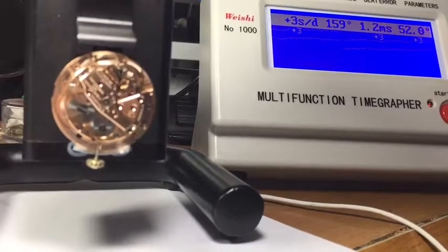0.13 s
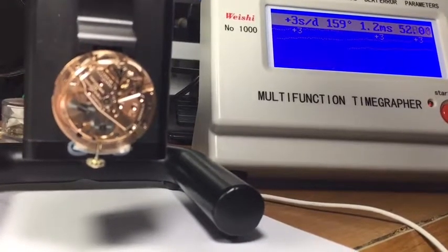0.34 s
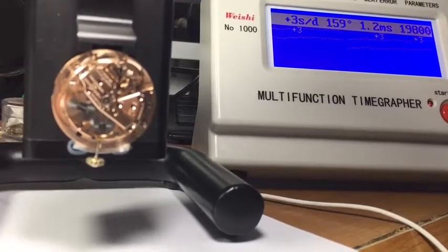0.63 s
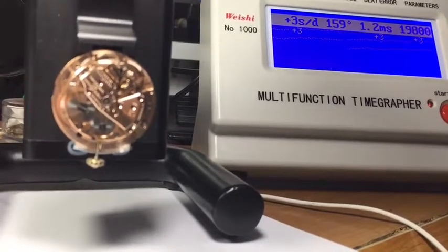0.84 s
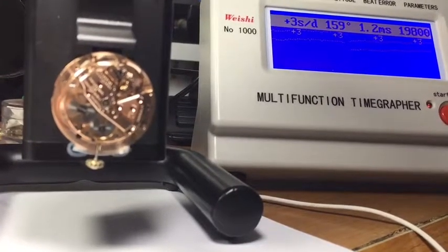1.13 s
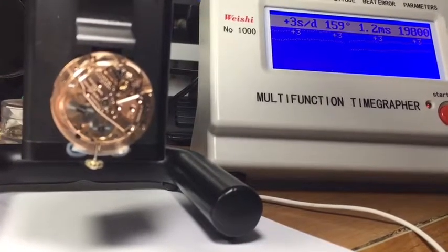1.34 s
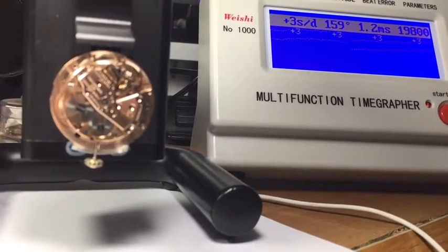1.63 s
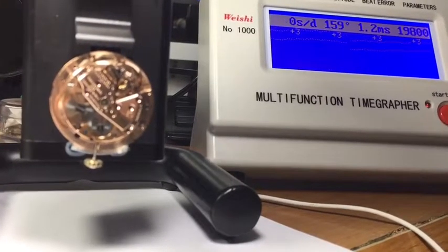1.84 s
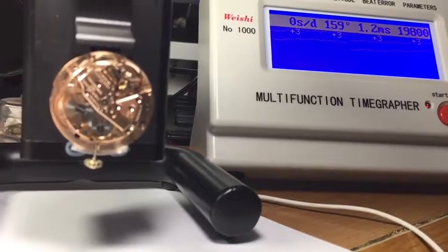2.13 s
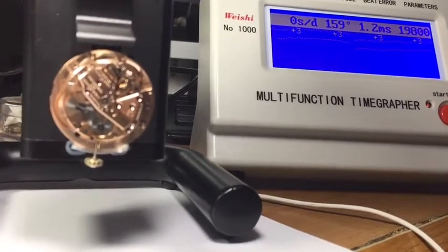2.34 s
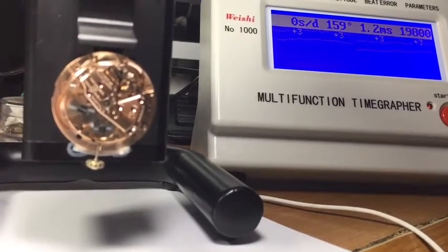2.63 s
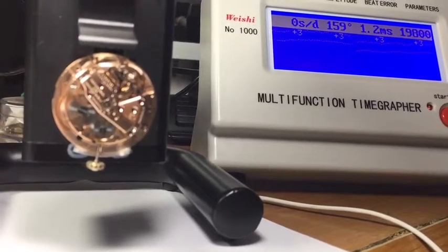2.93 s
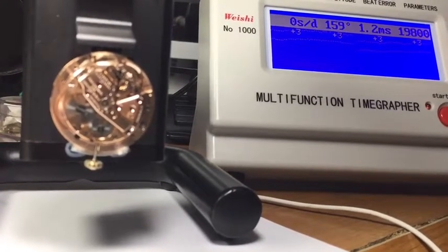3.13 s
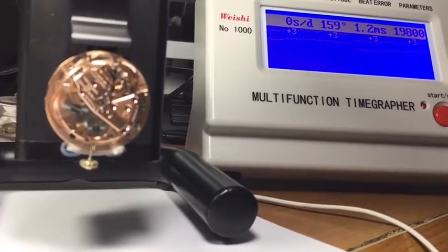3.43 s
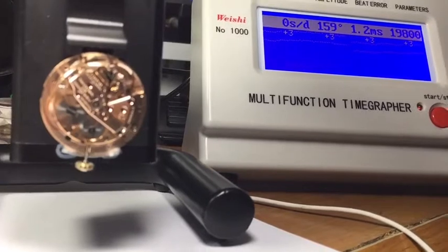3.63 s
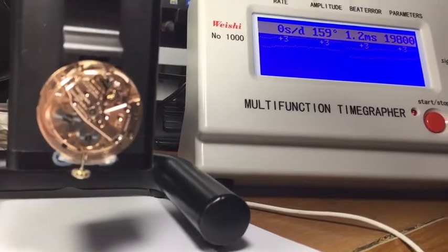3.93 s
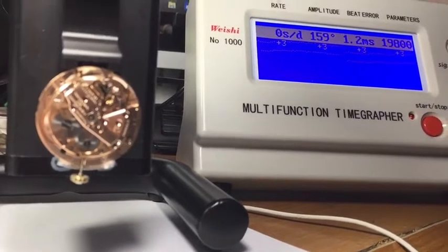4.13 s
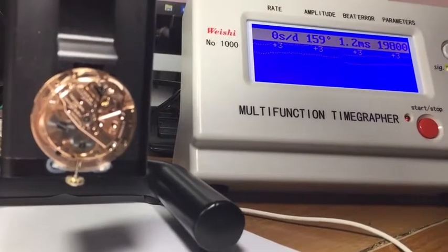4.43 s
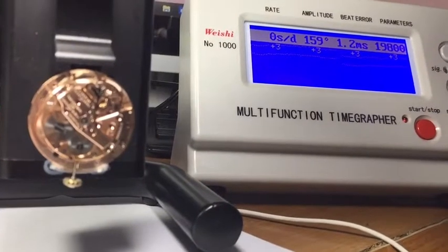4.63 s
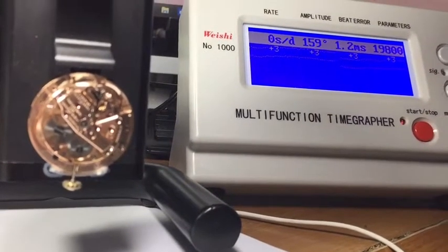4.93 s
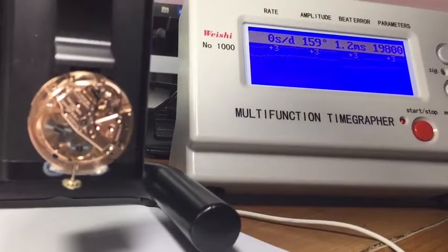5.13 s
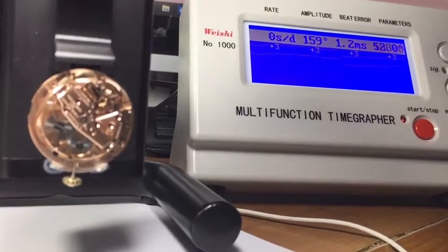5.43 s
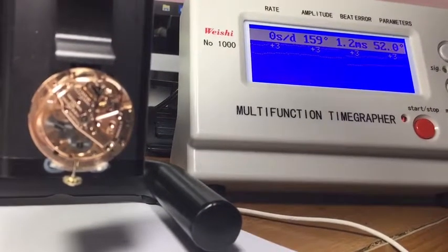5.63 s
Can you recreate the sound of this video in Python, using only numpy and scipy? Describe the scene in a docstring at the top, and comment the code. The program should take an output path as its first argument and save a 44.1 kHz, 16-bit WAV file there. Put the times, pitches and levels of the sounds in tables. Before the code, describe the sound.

A timing machine's buzzer ticks loudly and steadily along with a mechanical watch, close up in a quiet, faintly humming workshop.

```python
"""A timing machine's buzzer ticks loudly, close to the microphone, on a bench in a quiet workshop.
It answers a mechanical watch, whose escapement clicks faintly in the high treble 5.5 times a second.
Each tick bounces off the bench and rings briefly in the room. Mains hum, appliance tones, hiss and a
low rumble lie underneath; the hand on the microphone bumps softly, and a faint whine sets in late."""
import sys
import numpy as np
from scipy import signal
from scipy.fft import rfft, irfft
from scipy.io import wavfile
from scipy.ndimage import uniform_filter1d

SR = 44100
rng = np.random.default_rng(int(sys.argv[2]) if len(sys.argv) > 2 else 0)


def unload_audio(sound):
    """Save the sound as a 16-bit wav file, at the path given as the first command line argument."""
    columns = np.transpose(np.atleast_2d(sound))
    # keep every value between -1 and 1, then stretch to whole-number steps
    steps = np.round(np.clip(columns, -1, 1) * 32767)
    wavfile.write(sys.argv[1], SR, steps.astype(np.int16))


N = 254898
T = np.arange(N) / SR
HZ = np.fft.rfftfreq(2 * N, 1 / SR) + 1e-9


def undb(db):
    """Decibels to gain."""
    return 10 ** (np.asarray(db) / 20)


def filtered(x, response):
    """Pass a sound through a frequency response given on HZ."""
    return irfft(rfft(x, 2 * N) * response)[:N]


def resonances(modes):
    """Response of steep resonances side by side: each band-pass acts twice."""
    return sum(undb(db) / (1 + 1j * (HZ / hz - hz / HZ) * hz / width) ** 2 for hz, width, db in modes)


def impulses(times, sizes):
    """Band-limited impulses at the given seconds."""
    centres = np.asarray(times)[:, None] * SR
    taps = np.floor(centres).astype(int) + np.arange(-7, 9)
    shape = np.sinc(taps - centres) * np.sinc((taps - centres) / 8) * np.reshape(sizes, (-1, 1))
    inside = (taps >= 0) & (taps < N)
    return np.bincount(taps[inside], shape[inside], N)


def rattle(blows, decay_s, modes):
    """Each blow starts a dying burst of noise, coloured by the modes."""
    envelope = signal.lfilter([1], [1, -np.exp(-1 / (decay_s * SR))], blows + 1e-18)
    return filtered(envelope * rng.standard_normal(N), resonances(modes))


def walk(rate_hz):
    """Random levels held for 1 / rate_hz seconds and smoothed twice; spread 1."""
    hold = max(int(SR / rate_hz), 1)
    steps = np.repeat(rng.standard_normal(N // hold + 1), hold)
    smooth = uniform_filter1d(uniform_filter1d(steps, hold), hold)[:N]
    return smooth / smooth.std()


def tone(hz, waver_hz):
    """A sine of rms 1 whose pitch wanders."""
    cycles = np.cumsum(hz + waver_hz * walk(12)) / SR + rng.random()
    return np.sqrt(2) * np.sin(2 * np.pi * cycles)


# Swells of the mains hum, which the rumble follows too (time [s], level [dB])
HUM_SWELLS = [(0.0, -64), (0.06, -60), (0.61, -54), (0.66, -73), (0.96, -53.5), (1.24, -78), (1.54, -54.5),
              (2.01, -68.5), (2.12, -53.5), (2.45, -70), (2.61, -51.5), (2.7, -72), (3.35, -55),
              (3.75, -74.5), (3.83, -58.5), (4.52, -53), (4.62, -65), (5.78, -53)]


def mains_hum(hz=100, waver_hz=0.88, flutter_db=0.5):
    """Mains hum swells and fades in the workshop."""
    level_db = np.interp(T, *np.transpose(HUM_SWELLS))
    return tone(hz, waver_hz) * undb(level_db + flutter_db * walk(10))


def rumble(level_db=-64, hz=54, width_hz=26, follow_share=0.7):
    """A deep band of noise comes and goes with the hum."""
    noise = filtered(rng.standard_normal(N), resonances([(hz, width_hz, 0)]))
    hum_db = np.interp(T, *np.transpose(HUM_SWELLS))
    surge_db = follow_share * (hum_db - hum_db.mean())
    return undb(level_db + surge_db) * noise / noise.std()


# Tones of appliances in the background (frequency [Hz], level [dB], pitch waver [Hz])
APPLIANCE_TONES = [(146.1, -68.5, 3.05), (198.5, -69.5, 2.17), (230.3, -66, 2.507), (276.7, -67.5, 2.025),
                   (351.5, -79.5, 3.15), (495.6, -71, 1.937), (714, -99.5, .7), (916, -84.5, 0.94)]


def appliances(flutter_db=1.8):
    """Running appliances drone faintly, wavering in pitch and level."""
    return sum(tone(hz, waver) * undb(db + flutter_db * walk(10)) for hz, db, waver in APPLIANCE_TONES)


# Spectrum of the workshop's room tone (frequency [Hz], relative density [dB])
ROOM_TONE_SPECTRUM = [(20, -25), (60, -21.5), (125, -6), (175, -7.5), (250, 1), (330, -15), (480, -13),
                      (620, -19), (1400, -21), (3400, -27.5), (6000, -34), (10500, -39), (15500, -40)]


def room_tone(level_db=-60, swell_db=4.0, swell_below_hz=400):
    """Smooth hiss around the microphone, with an unevenly swelling low end."""
    hz, db = np.transpose(ROOM_TONE_SPECTRUM)
    colour = undb(np.interp(np.log(HZ), np.log(hz), db))
    noise = filtered(rng.standard_normal(N), colour)
    noise = undb(level_db) * noise / noise.std()
    lows = filtered(noise, np.exp(-(HZ / swell_below_hz) ** 2))
    return noise - lows + lows * undb(swell_db * walk(8))


def beats(first_s=0.00875, beat_s=0.1818145, beat_error_s=0.00125):
    """Times of the balance's swings, and which are tocks: those come slightly early."""
    index = np.arange(int(N / SR / beat_s) + 1)
    is_tock = index % 2
    return first_s + index * beat_s - is_tock * beat_error_s, is_tock


# Unlocking, impulse and drop, ahead of the buzzer (tick lead [ms], tock lead [ms], relative level [dB])
JEWEL_CONTACTS = [(21.0, 22.3, -14), (10.8, 12.2, -15), (8.3, 9.7, 0)]
# Ring of the watch plates (frequency [Hz], width [Hz], gain [dB])
PLATE_RESONANCES = [(6980, 440, -0.5), (11640, 1200, -4.5), (13900, 1100, 1), (15300, 1200, 0)]


def escapement(times, is_tock, gain_db=-47, ring_s=0.0016, scatter_db=2):
    """Pallet jewels strike the escape wheel three times a beat and shake the plates."""
    blows = 0
    for tick_ms, tock_ms, db in JEWEL_CONTACTS:
        lead_s = np.where(is_tock, tock_ms, tick_ms) / 1000
        sizes = undb(db + scatter_db * rng.standard_normal(len(times)))
        blows = blows + impulses(times - lead_s, sizes)
    return undb(gain_db) * rattle(blows, ring_s, PLATE_RESONANCES)


# Ring of the buzzer (frequency [Hz], width [Hz], gain [dB])
BUZZER_RESONANCES = [(2352, 535, 6.5), (4608, 514, -1.5)]
# Rasp of its diaphragm (frequency [Hz], width [Hz], gain [dB])
DIAPHRAGM_RASP = [(3066, 770, 4), (4104, 283, 14), (5260, 205, -0.5), (6370, 1200, -10.5),
                  (8800, 1900, -17.5), (11850, 330, -4.5), (12900, 6000, -28)]


def buzzer(times, pulse_hz=2287.5, pulse_count=7, drive_db=-1.32, scatter_db=0.6, pitch_scatter=0.0014,
           low_cut_hz=1800, muffle_hz=5700, rasp_gain_db=-41, rasp_s=0.0011):
    """A few drive pulses per beat ring the buzzer; its diaphragm rasps while it swings."""
    pitch_draw, level_draw = rng.standard_normal((len(times), 2)).T
    rates_hz = pulse_hz * (1 + pitch_scatter * pitch_draw)
    pulse_times = times[:, None] + np.arange(pulse_count) / rates_hz[:, None]
    sizes = undb(drive_db + scatter_db * level_draw)
    drive = impulses(pulse_times.ravel(), np.repeat(sizes, pulse_count))
    port = 1 - 1 / (1 + (HZ / low_cut_hz) ** 20)  # the small port radiates no lows
    housing = 0.19 + 0.77 / (1 + (HZ / muffle_hz) ** 20)  # swallows the high harmonics
    ring = filtered(drive, resonances(BUZZER_RESONANCES) * port * housing)
    return ring + undb(rasp_gain_db) * rattle(drive, rasp_s, DIAPHRAGM_RASP)


# Paths from the housing to the microphone, via bench and stand (delay [ms], pressure gain [ratio])
BENCH_PATHS = [(0, .37), (1.127, 1.0), (2.158, .64), (4.383, -.17), (5.941, .2), (9.73, .12)]


def bench(x):
    """Near surfaces add quick reflections that swell and draw out each tick."""
    return filtered(x, sum(gain * np.exp(-2j * np.pi * HZ * ms / 1000) for ms, gain in BENCH_PATHS))


def walls(x, wet_db=-21, t60_s=0.49, early_db=-21, early_t60_s=0.048,
          overtone_db=1, overtone_hz=4680, drift_rad_per_s=0.48):
    """Farther off, walls add early scatter and a diffuse tail that drift as the microphone moves."""
    t = T[:SR // 2]
    onset = np.clip((t - 0.010) / 0.010, 0, 1)  # a 10 ms gap, then a 10 ms rise
    # the buzzer's overtone spreads well into the room
    x = filtered(x, undb(overtone_db * np.exp(-((HZ - overtone_hz) / 300) ** 2)))
    reverbs = []
    for _ in range(2):
        response = 0
        for db, t60 in ((wet_db, t60_s), (early_db, early_t60_s)):
            decay = np.exp(-np.log(1000) * t / t60) * onset
            response = response + undb(db) * decay / np.linalg.norm(decay) * rng.standard_normal(len(t))
        reverbs.append(signal.fftconvolve(x, response)[:N])
    angle = drift_rad_per_s * T
    return np.cos(angle) * reverbs[0] + np.sin(angle) * reverbs[1]


# Bumps right at the microphone (time [s], half-length [s], frequency [Hz], crest level [dB])
HAND_BUMPS = [(0.367, 0.068, 297, -59), (4.19, 0.031, 177, -50.5), (5.504, 0.17, 188, -59.5)]


def handling(width_share=0.69):
    """The grip on the microphone shifts: short, dull swells of noise."""
    bumps = 0
    for crest_s, half_length_s, hz, db in HAND_BUMPS:
        thud = filtered(rng.standard_normal(N), resonances([(hz, width_share * hz, 0)]))
        swell = np.exp(-((T - crest_s) / half_length_s) ** 2)
        bumps = bumps + undb(db) * swell * thud / thud.std()
    return bumps


def whine(start_s=4.17, attack_s=0.4, hz=972, level_db=-78.5,
          octave_hz=198.6, octave_db=-63, waver_hz=0.88):
    """A faint whine sets in late and stays; the mains hum's octave comes up with it."""
    fade_in = np.clip((T - start_s) / attack_s, 0, 1)
    high_tone = undb(level_db) * tone(hz, waver_hz)
    hum_octave = undb(octave_db) * tone(octave_hz, waver_hz)
    return fade_in * (high_tone + hum_octave)


def scene():
    """One hand-held microphone near the watch and buzzer, the workshop around it."""
    times, is_tock = beats()
    near = bench(buzzer(times)) + escapement(times, is_tock)
    reverb = walls(near)
    background = mains_hum() + whine() + appliances() + room_tone() + rumble()
    return (near + reverb + background + handling())[None]


def record(dry, top_hz=15550):
    """The recorder cuts the top treble steeply."""
    low_pass = signal.ellip(10, 0.2, 70, top_hz, fs=SR, output="sos")
    return signal.sosfilt(low_pass, dry)


dry = scene()
out = record(dry)
unload_audio(out)
```